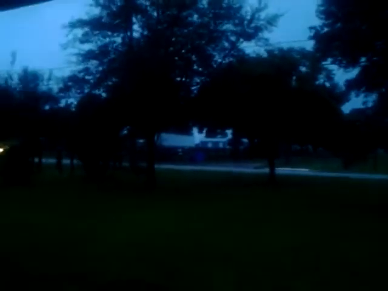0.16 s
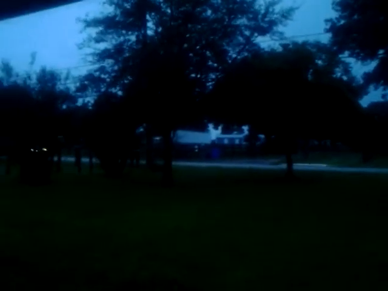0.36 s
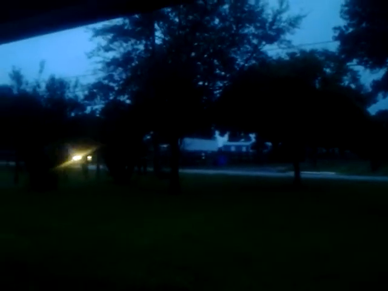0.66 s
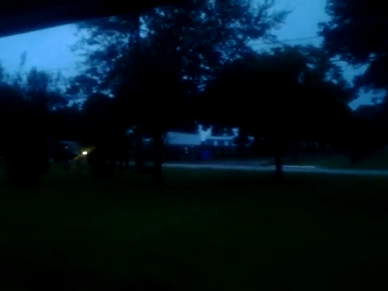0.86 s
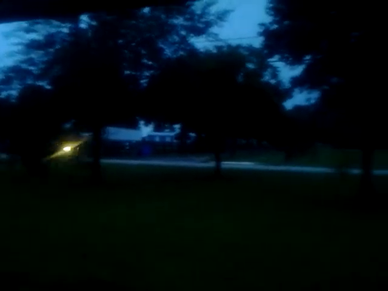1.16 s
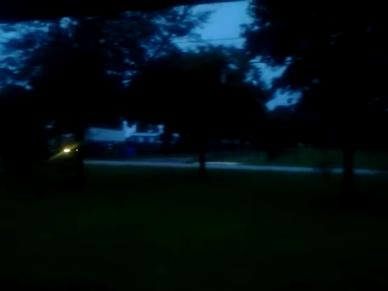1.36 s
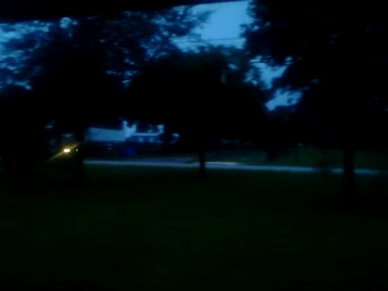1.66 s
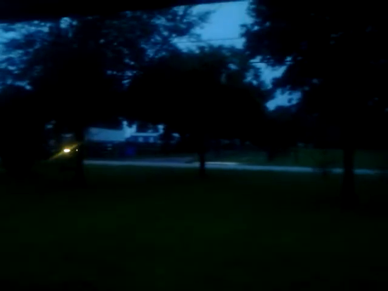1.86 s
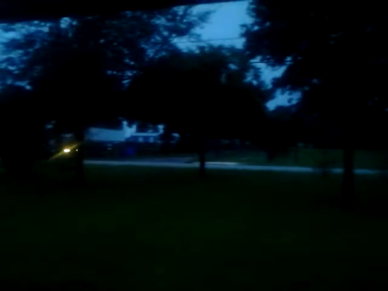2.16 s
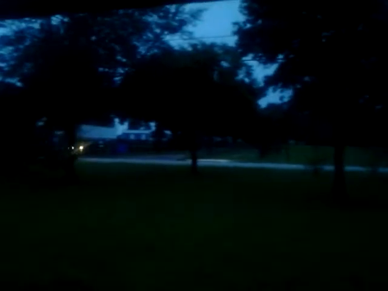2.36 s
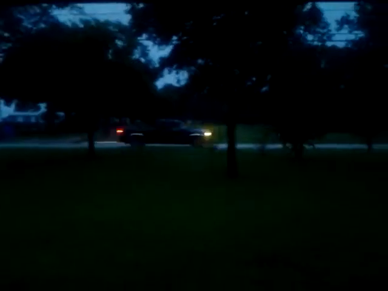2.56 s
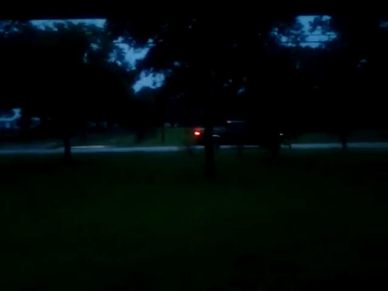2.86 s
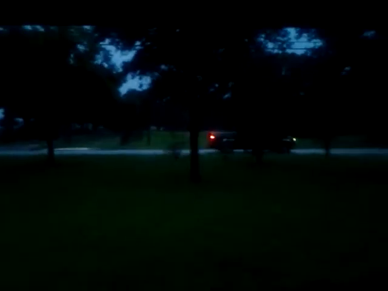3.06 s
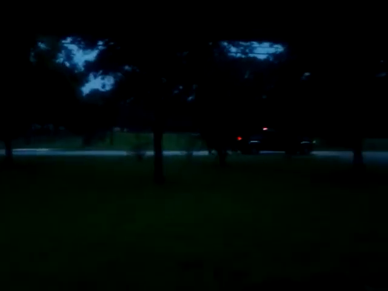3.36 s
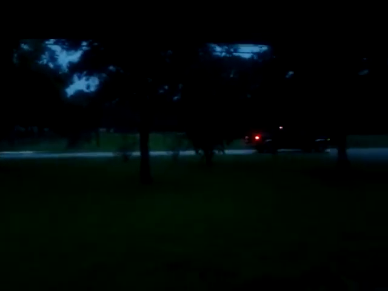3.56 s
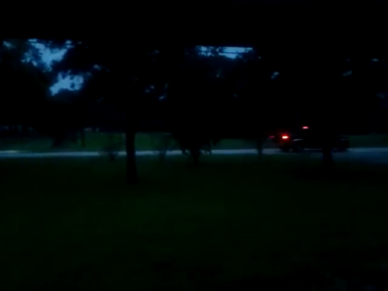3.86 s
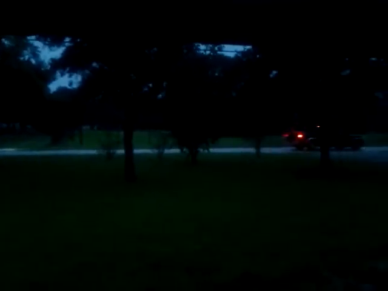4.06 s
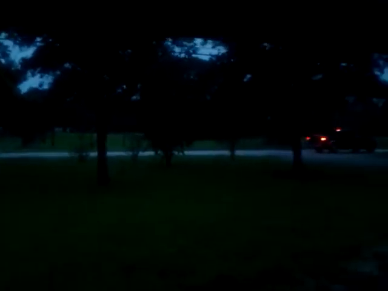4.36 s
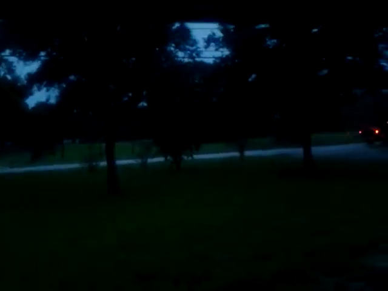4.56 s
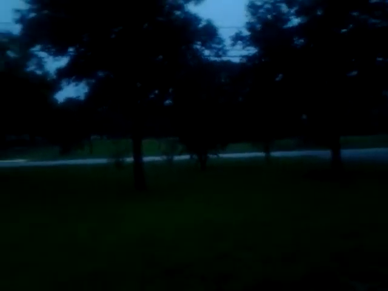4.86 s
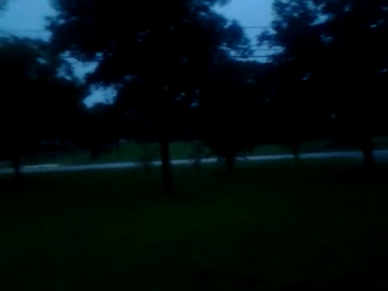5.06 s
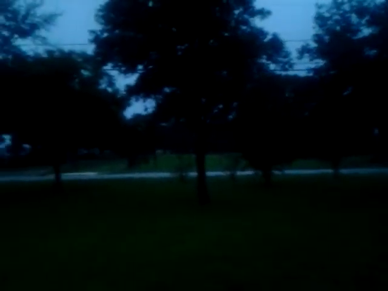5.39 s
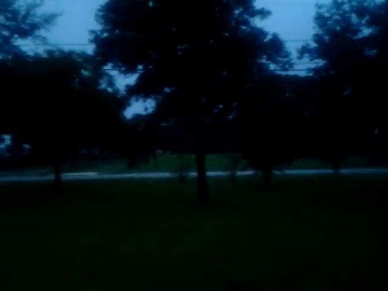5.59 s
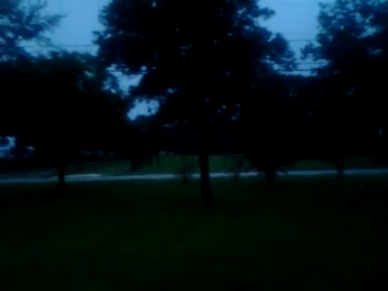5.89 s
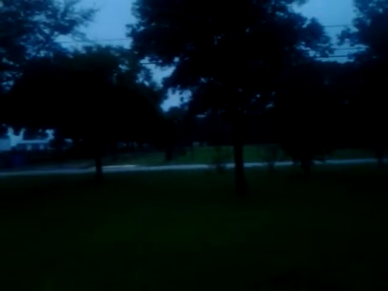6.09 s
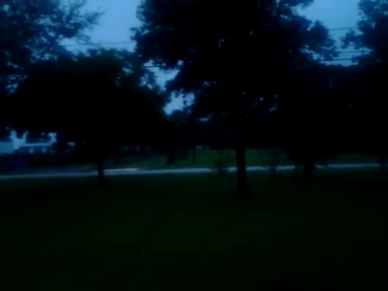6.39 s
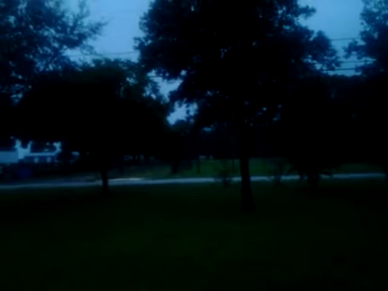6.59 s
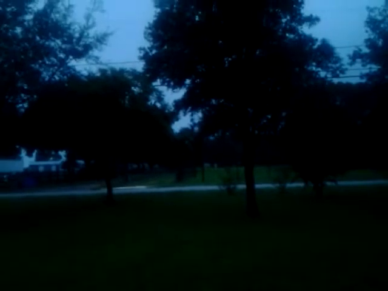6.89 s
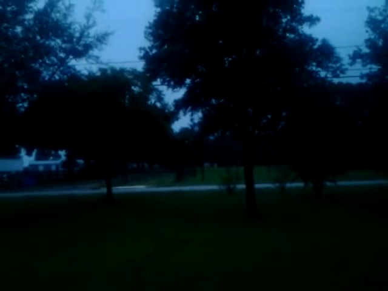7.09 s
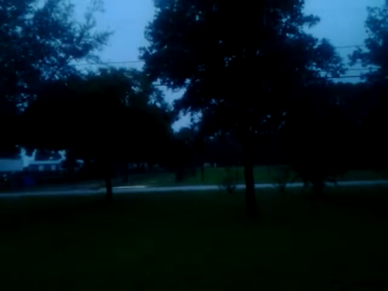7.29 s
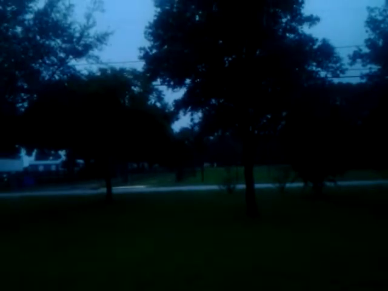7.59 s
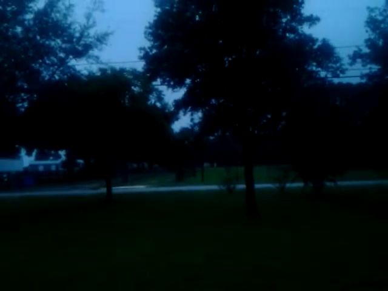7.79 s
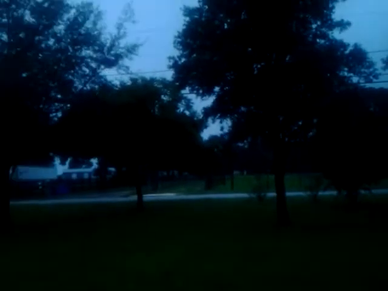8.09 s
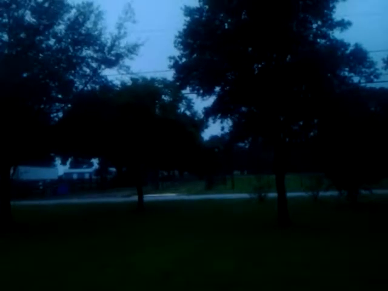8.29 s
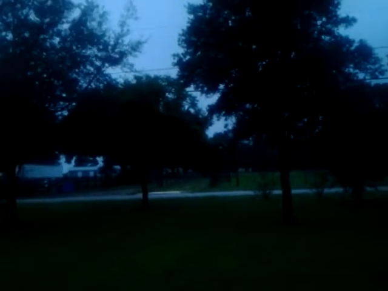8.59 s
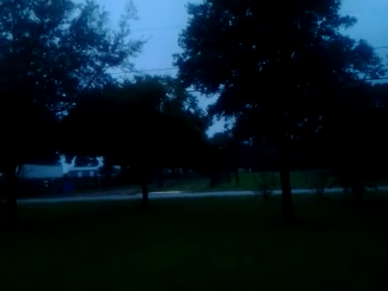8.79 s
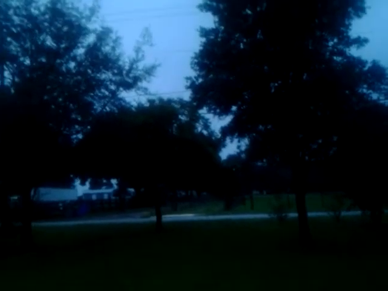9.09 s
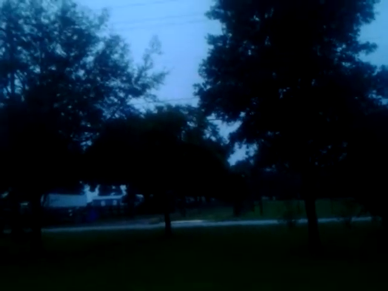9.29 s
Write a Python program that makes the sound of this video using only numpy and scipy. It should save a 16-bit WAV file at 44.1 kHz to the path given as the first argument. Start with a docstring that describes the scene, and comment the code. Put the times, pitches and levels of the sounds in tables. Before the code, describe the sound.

Rushing wet tyres and splashing spray pass by and drop away around five seconds, leaving stormy leaf wash, fine patter and sparse drop ticks.

```python
"""A truck roars by on a wet road beyond a lawn, while storm wind and rain wash through the trees.
Leaves, tyres, spray and mist are noise shaped frame by frame; the engine hum is resonated noise.
The roar sinks in pitch, splashes lift the water hiss, then the truck drops behind cover and fades.
Fine patter runs on; single drops tick close by as short decaying sines, and one dull knock is heard.
A phone microphone in its housing takes it all in mono."""
import sys
import numpy as np
from scipy import signal
from scipy.fft import rfft, irfft
from scipy.io import wavfile
from scipy.ndimage import uniform_filter1d

SR = 44100
rng = np.random.default_rng(int(sys.argv[2]) if len(sys.argv) > 2 else 0)


def log_audio(samples):
    """Write samples as a 16-bit WAV file to the path given in sys.argv[1]."""
    # one column per channel
    frames = np.atleast_2d(samples).T
    # limit to full scale, then quantise
    limited = np.clip(frames, -1, 1)
    pcm = np.round(limited * 32767).astype(np.int16)
    wavfile.write(sys.argv[1], SR, pcm)


N = 416304
HZ = np.fft.rfftfreq(512, 1 / SR)  # bins of the noise frames
FRAMES = np.arange(N // 128 + 6) * 128 / SR  # frame times in seconds
TIME = np.arange(N) / SR  # sample times in seconds
GONE = np.clip(FRAMES - 5.1, 0, 5)  # seconds of fading down the road


def gain_of(db):
    """Decibels to an amplitude factor."""
    return 10 ** (np.asarray(db) / 20)


def evened(x):
    """Scales to an rms of one."""
    return x / np.sqrt(np.mean(x ** 2) + 1e-20)


def colour(points):
    """Spectrum table, drawn over log frequency, to a gain column of unit total power."""
    f, db = np.transpose(points)
    gain = gain_of(np.interp(np.log(HZ + 1), np.log(f), db, -70, -70))
    return (gain / np.linalg.norm(gain))[:, None]


def hump(centre_hz, width_hz, order=2):
    """A broad, possibly moving band of unit total power; order 4 gives a flat top and steep skirts."""
    gain = 1 / (1 + ((HZ[:, None] - centre_hz) / width_hz) ** order)
    return gain / np.linalg.norm(gain, axis=0)


def dip(centre_hz, width_hz):
    """Bell-shaped weight around a frequency, which may move with time."""
    return np.exp(-((HZ[:, None] - centre_hz) / width_hz) ** 2)


def curves(rows):
    """Table columns drawn over the frame times; each holds its last value."""
    s, *columns = np.transpose(rows)
    return [np.interp(FRAMES, s, column) for column in columns]


def bumps(rows):
    """Sum of bell-shaped level changes (t/s, change/dB, half length/s) at frame times."""
    return sum(db * np.exp(-((FRAMES - s) / half_s) ** 2) for s, db, half_s in rows)


def smoothed(x, bins, frames):
    """Random field averaged over neighbouring bins and frames, at unit rms."""
    over_bins = uniform_filter1d(x, size=bins, axis=0)
    return evened(uniform_filter1d(over_bins, size=frames, axis=1))


def unrest(patchy_db, flicker_db, flicker_frames=6):
    """Random gain: drifting patches plus a quick flicker shared over wide bands."""
    a, b = rng.standard_normal((len(FRAMES), len(HZ), 2)).T
    patches = smoothed(a, bins=6, frames=24)
    flicker = smoothed(b, bins=60, frames=flicker_frames)
    return evened(gain_of(patchy_db * patches + flicker_db * flicker))


def noise(magnitude):
    """Noise whose rms follows the column norms of a bins x frames magnitude."""
    a, b = rng.standard_normal((len(FRAMES), len(HZ), 2)).T
    spectrum = a + 1j * b
    flat = signal.istft(spectrum, nperseg=512, noverlap=384)[1]
    shaped = signal.istft(spectrum * magnitude, nperseg=512, noverlap=384)[1]
    return shaped[:N] * np.sqrt(len(HZ)) / flat.std()


def resonate(x, hz, width):
    """Narrow resonance: shifts hz down to zero, smooths, and shifts back."""
    turn = np.exp(2j * np.pi * hz * np.arange(len(x)) / SR)
    r = np.exp(-np.pi * width / SR)
    return (turn * signal.lfilter([1 - r], [1, -r], x / turn)).real


def ping(hz, length_ms):
    """A sine tick that swells fast and rings out."""
    t = np.arange(1024) / SR
    u = 11500.0 * t / length_ms  # the envelope peaks at u = 1
    return u * np.exp(1 - u) * np.sin(2 * np.pi * hz * t)


def add(mix, s, sound):
    """Lays a sound into the mix at s seconds."""
    part = mix[round(s * SR):][:len(sound)]
    part += sound[:len(part)]


def storm():
    """Wind and rain in wet leaves: a broad wash whose fine hiss on top has its own swell."""
    # course of the wash: t/s, level/dB, fine rain hiss relative to it/dB
    course = [(0, -42.5, -4.5), (1, -39.5, -9), (2.5, -46, -4), (4.5, -42.5, -7.5), (5.7, -41, -5.5),
              (6.3, -42, -2.5), (7.8, -42.5, -0.5), (8.3, -43.5, -1), (8.8, -42.5, -2), (9.44, -44.5, 1.5)]
    # colour of the leaves: f/Hz, relative density per Hz/dB
    leaves = [(76, -51), (130, -2.5), (206, -18), (257, -24.5), (302, -10.5), (562, -2.5), (986, -1),
              (1800, -5), (2160, -7.5), (2580, -6), (3930, -3.5), (5530, -12.5), (8100, -0.5),
              (11400, -16.5), (15700, -21)]
    level_db, hiss_db = curves(course)
    above = 1 / (1 + (7000 / (HZ[:, None] + 1)) ** 8)
    below = 1 / (1 + (HZ[:, None] / 11500) ** 8)
    wash = colour(leaves) * gain_of(level_db + hiss_db * above * below)
    return noise(wash * unrest(patchy_db=0.42, flicker_db=0.75))


def tyre_spectrum():
    """Tyre roar, rumble and tread hiss as three bands; Doppler shift sinks the lower two."""
    # tyres: t/s, roar level/dB, rumble level/dB, tread hiss level/dB, tread centre f/Hz, unused here
    course = [(0, -42.5, -50.5, -41, 1850, -63.5), (.7, -38.5, -46, -41.5, 1800, -54.5),
              (1.3, -39, -45.5, -41.5, 1720, -59), (1.9, -38.5, -44.5, -40.5, 1630, -60),
              (2.3, -41, -44, -41, 1550, -62.5), (2.65, -41.5, -41, -43, 1650, -58.5),
              (3.1, -39.5, -43.5, -42, 1800, -56.5), (3.6, -42, -47.5, -41, 1840, -69),
              (4.4, -43, -52.5, -39, 1750, -64), (5, -49, -52.5, -50, 1750, -60.5),
              (5.2, -53, -54, -57, 1790, -62)]
    roar_db, rumble_db, tread_db, tread_hz, _ = curves(course)
    # each pitch falls by about twice its share around the pass; the rumble sinks later
    roar_hz = 1133 * (1 - 0.075 * np.tanh((FRAMES - 1.23) / 0.55))
    rumble_hz = 675 * (1 - 0.093 * np.tanh((FRAMES - 2.16) / 0.55))
    power = (hump(roar_hz, 220) * gain_of(roar_db)) ** 2
    power += (hump(rumble_hz, 185, order=4) * gain_of(rumble_db)) ** 2
    power += (hump(tread_hz, 505) * gain_of(tread_db)) ** 2
    return np.sqrt(power) * unrest(patchy_db=0.68, flicker_db=-0.08) * gain_of(-14 * GONE)


def wetness():
    """Spray and mist levels in dB: slow course, lifted by puddle splashes, altered by tree trunks."""
    # water thrown off the wheels: t/s, spray level/dB, fine mist level/dB
    course = [(0, -42, -55), (.6, -39.5, -52.5), (1, -39, -52.5), (1.5, -39, -51.5), (2, -37, -48),
              (2.35, -38, -48.5), (2.6, -36.5, -47.5), (3, -37, -50), (3.3, -35.5, -43), (3.7, -35, -40),
              (4, -35.5, -44), (4.25, -35, -42.5), (4.55, -39.5, -43.5), (4.8, -43, -48), (5, -49, -53)]
    # a wheel crosses a puddle: t/s, spray rise/dB, mist rise/dB, half length/s
    splashes = [(1.63, 2, 4, .03), (1.87, 3, 2.5, .05), (2.095, 0, 5, .02), (2.54, 2, 0, .04),
                (2.653, 0.5, 0, 0.014), (2.81, 2.5, 4, 0.033), (3.085, 2.5, 5, .025), (3.203, 0, 4, 0.02),
                (3.36, 2, 1, .04), (3.46, 0.5, 1, 0.018), (3.626, 3, 2.5, .05), (3.9, 0.5, 3, 0.018),
                (4.257, 2, 2, .035), (4.4, 0, 1.5, .03), (4.57, 2.5, 4, 0.014), (4.687, 2.5, 2, .02)]
    # trunks briefly hide the water, one entry lifts it instead: t/s, level change/dB
    trunks = [(1.7, -1.5), (2.87, -2), (3.135, -1.5), (3.415, -3), (3.54, 1.5), (4.31, -3), (4.46, -3)]
    spray_db, mist_db = curves(course)
    s, spray_rise_db, mist_rise_db, half_s = np.transpose(splashes)
    hidden_db = bumps([(at, db, 0.016) for at, db in trunks])
    spray_db = spray_db + bumps(zip(s, spray_rise_db, half_s)) + hidden_db
    mist_db = mist_db + bumps(zip(s, mist_rise_db, half_s)) + hidden_db
    return spray_db, mist_db


def water_spectrum():
    """Coarse spray, mist and the finest haze off the wheels; they change colour once heard from behind."""
    # spray colour: f/Hz, relative density per Hz/dB
    spray_colour = [(1500, -35), (2300, -3.5), (3000, -0.5), (4120, 2.5), (5800, -1.5), (7110, 3),
                    (7500, 2), (8350, -25), (9000, -28), (11700, -35)]
    # mist colour: factor on the mist centre, relative density per Hz/dB
    mist_colour = [(.72, -5), (.84, -2), (.93, 1), (1.0, 3.5), (1.1, -1.5), (1.2, -5), (1.35, -13.5),
                   (1.6, -18)]
    spray_db, mist_db = wetness()
    behind = .5 + .5 * np.tanh((FRAMES - 3.2) / 0.21)  # 0 from the side, 1 from behind
    tilt_db = -0.5 + 3.5 * behind  # per octave around 5500 Hz
    mist_hz = 10050 - 1450 * behind
    octaves = np.log2((HZ[:, None] + 1) / 5500)
    spray = colour(spray_colour) * gain_of(spray_db + tilt_db * octaves)
    factor, shape_db = np.transpose(mist_colour)
    mist = gain_of(np.interp(HZ[:, None] / mist_hz, factor, shape_db, -60))
    mist = mist / np.linalg.norm(mist, axis=0) * gain_of(mist_db)
    haze = hump(12300, 1200, order=4) * gain_of(mist_db - 19)
    water = np.hypot(spray, np.hypot(mist, haze))
    return water * unrest(patchy_db=1.23, flicker_db=1.0, flicker_frames=4) * gain_of(-25 * GONE)


def lawn_echo():
    """The echo off the lawn interferes with the direct sound: bands that slide with the path."""
    # bands: t/s, upper f/Hz, its level change/dB, lower f/Hz, its level change/dB
    ground = [(0, 2980, -5, 2400, 3.5), (1, 2640, -4, 2240, 5), (1.6, 2660, -4.5, 2200, -2),
              (2.1, 2470, -3.5, 2140, -2), (2.6, 2680, -3, 1930, -4), (3.1, 2840, -7.5, 1820, -7),
              (3.6, 2980, -9.5, 1790, -3.5), (4.3, 3080, -3, 1760, -5), (5.2, 3000, -9, 1750, 1)]
    upper_hz, upper_db, lower_hz, lower_db = curves(ground)
    hollow_db = -3 * np.clip(FRAMES - 1.9, 0, 1)  # a third band weakens after the pass
    return gain_of(upper_db * dip(upper_hz, 370) + lower_db * dip(lower_hz, 240)
                   + hollow_db * dip(1290, 66))


def engine_hum(hum_db):
    """Engine and exhaust: one noise drives three resonances, each passed twice."""
    # resonances: f/Hz, width/Hz, relative level/dB
    modes = [(160, 37, -22), (218.5, 32, -4.5), (316.7, 55, 6)]
    drive = rng.standard_normal(N)
    hum = np.zeros(N)
    for hz, width, db in modes:
        ringing = resonate(resonate(drive, hz, width), hz, width)
        hum += gain_of(db) * evened(ringing)
    level = gain_of(hum_db - 7.7 * GONE)  # fades more slowly than tyres and water
    return evened(hum) * np.interp(TIME, FRAMES, level)


def truck():
    """Tyres and water add in power and pass over the lawn; the engine hums beneath."""
    # of these tyre and engine columns only t/s and the last, hum level/dB, serve here
    course = [(0, -42.5, -50.5, -41, 1850, -63.5), (.7, -38.5, -46, -41.5, 1800, -54.5),
              (1.3, -39, -45.5, -41.5, 1720, -59), (1.9, -38.5, -44.5, -40.5, 1630, -60),
              (2.3, -41, -44, -41, 1550, -62.5), (2.65, -41.5, -41, -43, 1650, -58.5),
              (3.1, -39.5, -43.5, -42, 1800, -56.5), (3.6, -42, -47.5, -41, 1840, -69),
              (4.4, -43, -52.5, -39, 1750, -64), (5, -49, -52.5, -50, 1750, -60.5),
              (5.2, -53, -54, -57, 1790, -62)]
    hum_db = curves(course)[-1]
    road = np.hypot(tyre_spectrum(), water_spectrum())
    return noise(road * lawn_echo()) + engine_hum(hum_db)


def patter(db, per_s, spread_db):
    """Many small drops of random size and pitch, a few of them large; per_s is their mean rate."""
    size = gain_of(spread_db * np.minimum(rng.exponential(1, N), 4))
    hits = size * (rng.random(N) < per_s / SR)
    kind = rng.integers(0, 12, N)
    out = np.zeros(N)
    for k, hz in enumerate(np.geomspace(3800, 8300, num=12)):
        out += signal.oaconvolve(hits * (kind == k), ping(hz, 2.4))[:N]
    return gain_of(db) * evened(out)


def spray_patter():
    """Dense drops that follow the spray level and stop at 5.1 s."""
    spray = gain_of(np.interp(TIME, FRAMES, wetness()[0])) * (np.arange(N) < 5.1 * SR)
    return spray * patter(-10.5, 600, 2.4)


def near_drops():
    """Close ticks, each with a weak higher ring; all last about as many cycles."""
    # drops: t/s, main tick level/dB, f/Hz
    ticks = [(.9497, -25, 7540), (1.6059, -26, 9650), (1.8158, -23, 6550), (1.8951, -28, 6550),
             (2.0886, -19, 7500), (2.0976, -24, 9990), (2.1471, -23, 7580), (2.6459, -20, 8610),
             (2.7044, -21, 7240), (2.9266, -26, 5860), (3.3344, -21, 6200), (3.444, -21, 8100),
             (3.879, -22, 7580), (3.9018, -22, 3900), (3.9392, -21, 5860), (3.9501, -26, 3820),
             (3.998, -21, 6890), (4.205, -23, 4130), (4.2209, -24, 6890), (4.271, -32, 8610),
             (4.5607, -23, 4800), (4.6975, -26, 8500), (5.1648, -31, 6550), (6.1169, -34, 5540),
             (6.124, -25, 8100), (6.624, -33, 6550), (7.5397, -29, 6890), (8.3684, -31, 7580),
             (8.3732, -28, 8610), (8.7873, -33, 7580), (9.2686, -31, 7920)]
    out = np.zeros(N)
    for s, db, hz in ticks:
        length_ms = 21.6 / hz * 1e3
        ring = ping(min(1.23 * hz, 14000), 1.7 * length_ms)
        add(out, s, gain_of(db) * (ping(hz, length_ms) + .25 * ring))
    return out


def housing_knock():
    """A dull knock on the housing: 2.3 cycles of a cosine in a smooth window."""
    # knock: t/s, level/dB, f/Hz
    s, db, hz = (4.0475, -25.5, 560)
    out = np.zeros(N)
    t = np.arange(round(2.3 * SR / hz)) / SR
    add(out, s, gain_of(db) * np.hanning(len(t)) * -np.cos(2 * np.pi * hz * (t - t.mean())))
    return out


def scene():
    """Sums all layers into two equal channels."""
    mono = storm() + truck() + patter(-63.5, 200, 2.4) + spray_patter()
    mono = mono + near_drops() + housing_knock()
    return np.array([mono, mono])


def record(dry):
    """The housing colours, the microphone drops the bass and adds faint low flutter; then a band limit."""
    # small bumps and dips of the phone housing: f/Hz, width/Hz, level change/dB
    body = [(470, 31, -1.5), (650, 22, 0), (1170, 51, -0.1), (1274, 60, -1.5), (1470, 69, 1),
            (2450, 106, 2), (2660, 93, 0.5), (3520, 160, -1), (7750, 180, 2), (10300, 350, 0.5),
            (12000, 540, -2.5)]
    hz = np.fft.rfftfreq(N, 1 / SR)
    housing = gain_of(sum(db * np.exp(-((hz - f) / width) ** 2) for f, width, db in body))
    coloured = irfft(rfft(dry) * housing, N)
    thin = signal.sosfilt(signal.butter(4, 160, "high", fs=SR, output="sos"), coloured)
    low_pass = signal.butter(2, 100, fs=SR, output="sos")
    flutter = evened(signal.sosfilt(low_pass, rng.standard_normal(N)))
    drift = uniform_filter1d(uniform_filter1d(rng.standard_normal(N), size=4000), size=4000)
    lumps = gain_of(3.5 * evened(drift))  # the flutter swells and sinks at random
    thin = thin + gain_of(-87.5) * flutter * lumps
    band_limit = signal.firwin(1023, 15770, window=("kaiser", 9), fs=SR)  # low-pass edge in Hz
    return signal.oaconvolve(thin, band_limit[None], "same")


dry = scene()
out = record(dry)
log_audio(out)
```